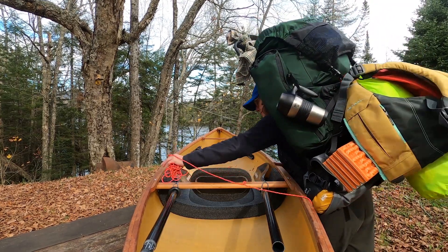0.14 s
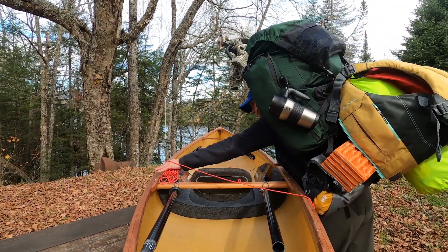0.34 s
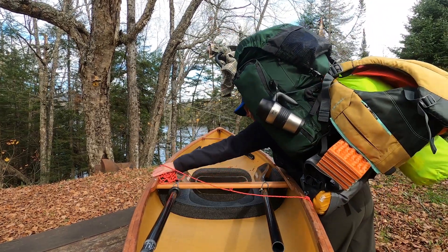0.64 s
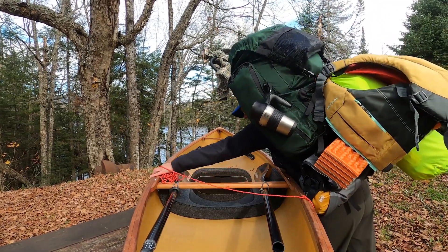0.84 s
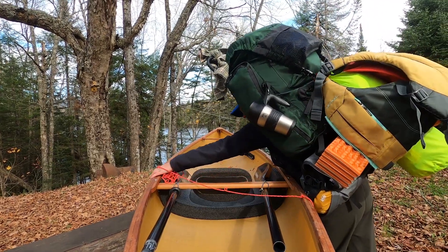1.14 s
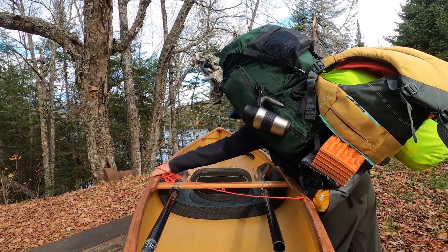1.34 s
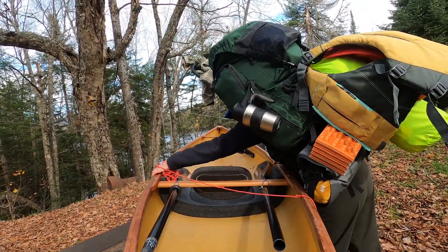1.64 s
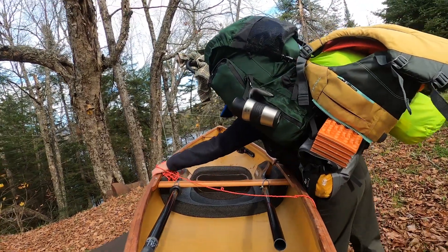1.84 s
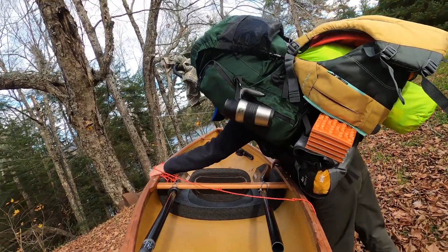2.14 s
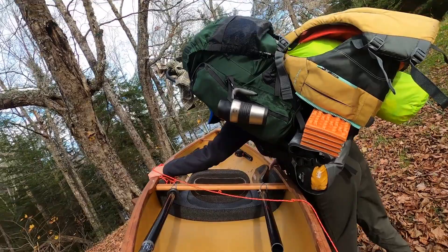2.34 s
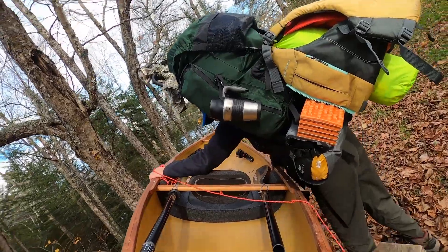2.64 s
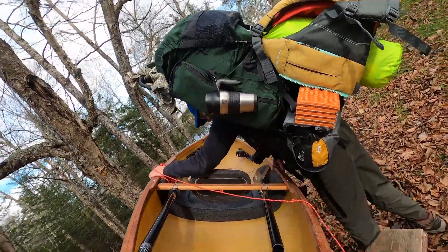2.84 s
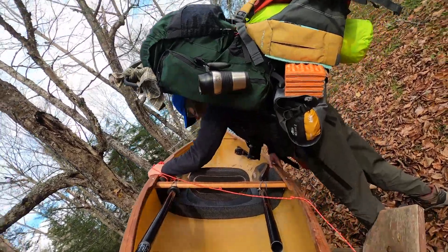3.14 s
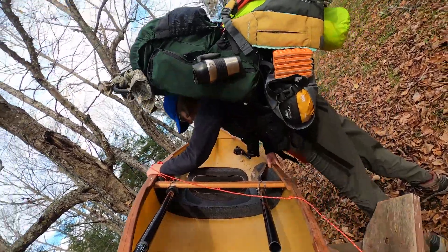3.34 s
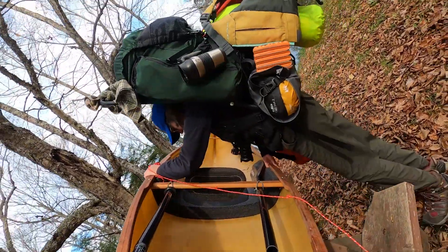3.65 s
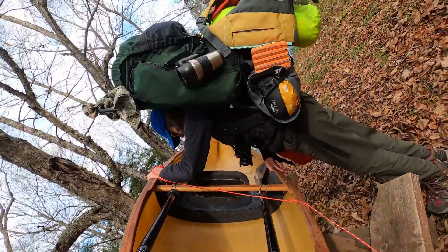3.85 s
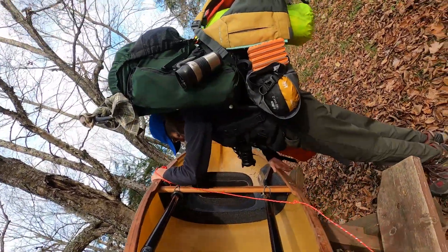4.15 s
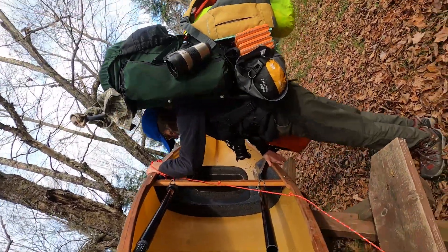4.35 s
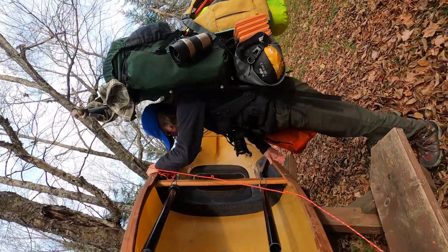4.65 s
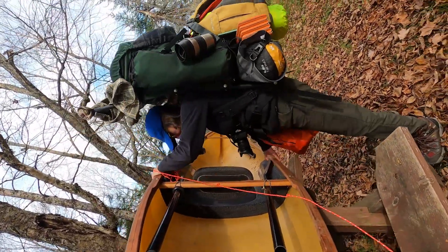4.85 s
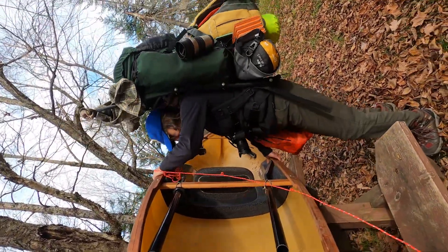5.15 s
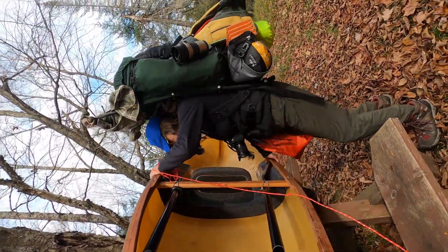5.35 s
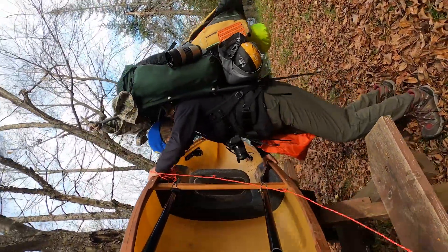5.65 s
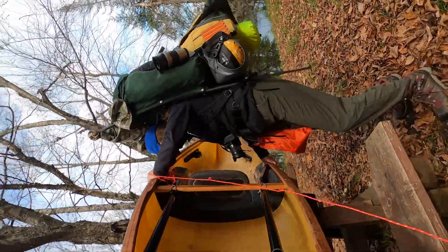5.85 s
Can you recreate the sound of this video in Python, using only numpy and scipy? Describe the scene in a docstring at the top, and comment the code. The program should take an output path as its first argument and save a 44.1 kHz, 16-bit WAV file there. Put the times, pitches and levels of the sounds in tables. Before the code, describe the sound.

Close stereo sound from inside a canoe hull being rolled onto its side in a quiet forest. From 0 to 0.9 s, short hollow judders, gritty scraping and soft low bumps shake the mount. A sharp cluster of knocks with a hard clack and tick comes near 0.96 s, then lighter scrapes and a longer rub with creaks from 1.5 s. Gear clacks at about 1.75 s and knocks follow to 1.9 s; a deep, dull boom at 2.1 s leads into a thin, fading skid until 2.5 s. After a near lull around 2.6 s, the strongest burst of booming, cracking blows hits at 3.0 s. Nylon and dry leaves swish at 3.5-3.7 s, more to the right, and again near 4.75 s. Irregular knocks, scrapes, low groans and small buckle ticks continue from 3.7 s, ending with a rising rustle near 6 s.

```python
"""A canoe hull, rolled onto its side on leafy forest ground by a loaded hiker, heard from inside the shell.
Blows of gunwale and gear excite its bending and panel modes; each blow adds a dry crack of filtered noise.
Stick-slip impulses make it scrape, groan and skid; wavering tones and bands make its judders and squeaks.
Nylon and dry leaves, heard more to the right, are dense filtered impulses; buckles tick, hard gear clacks.
The close stereo microphone is fixed to the hull: its mount trembles with each heave, in still forest air."""
import sys
import numpy as np
from scipy import signal
from scipy.fft import rfft, irfft
from scipy.io import wavfile
from scipy.ndimage import uniform_filter1d, map_coordinates

SR = 44100
rng = np.random.default_rng(int(sys.argv[2]) if len(sys.argv) > 2 else 0)


def to_wav(s):
    """Save 16-bit WAV."""
    ch = np.atleast_2d(s).T  # columns
    pcm = np.round(np.clip(ch, -1, 1) * 32767)  # PCM
    wavfile.write(sys.argv[1], SR, pcm.astype(np.int16))


N = 264600
TIME = np.arange(N) / SR  # s
RING = 22050  # longest ring of a mode, samples
TOP_HZ = 15600  # upper limit of the microphone channel
SKID_S, SKID_LENGTH_S = 2.15, .355  # a lighter, thinner skid as the hull tips over
LULL_DB = -11  # change of stirring at the middle of a lull

# Blows on the hull. Each row: start in seconds, relative levels of boom, hollow tone and knock in dB,
# contact time in ms.
KNOCKS = [(0.34, -42, -52, -48, 0.28), (0.531, -58, -49, -54.5, 0.34), (0.606, -32, -47.5, -55.5, 0.24),
          (.828, -30, -43, -54, 2.6), (0.957, -47, -38.5, -40, 0.26), (.962, -50, -28.5, -35, 0.26),
          (0.971, -30, -55, -37.5, 0.68), (1.053, -59, -40.5, -52, 0.29), (1.279, -40, -36.5, -51, 1.16),
          (1.76, -41.5, -54, -48.5, 0.18), (1.829, -53, -34, -41, 0.28), (1.856, -33.5, -37.5, -44, 0.5),
          (1.881, -26.5, -36, -43, 0.85), (2.073, -41, -27, -58, 5.9), (2.102, -19.5, -30.5, -48, 8.7),
          (2.145, -45, -35.5, -44.5, 0.36), (2.264, -50, -39, -61, 1.4), (2.378, -65, -45, -55.5, 0.52),
          (2.495, -71, -70, -63, 0.22), (2.607, -57, -57, -61, 0.34), (2.82, -41, -39.5, -45, 0.37),
          (2.952, -39, -41, -49, 2.2), (3.007, -15.5, -31, -34, 0.34), (3.012, -22, -34, -33, 0.34),
          (3.016, -33, -34, -38.5, 0.65), (3.029, -19, -38, -41, 0.34), (3.038, -38, -41, -45, 0.45),
          (3.071, -36, -39, -42, 1.7), (3.13, -63, -39, -42.5, 1.03), (3.202, -37, -35.5, -47, 0.31),
          (3.225, -47, -40, -47.5, 3.1), (3.311, -37.5, -44, -68, 18), (3.449, -38.5, -43.5, -51, 0.33),
          (3.705, -55, -50, -54.5, 0.29), (3.763, -48, -48, -47.5, .3), (3.823, -48, -40.5, -46, 0.67),
          (4.219, -38, -46, -62, 6), (4.262, -46, -42.5, -53.5, 0.56), (4.308, -36, -43, -51.5, 0.67),
          (4.339, -54, -42, -50, 0.36), (4.419, -42, -42, -49.5, 0.33), (4.453, -29.5, -47, -70, 2),
          (4.515, -33.5, -34.5, -37, 0.84), (4.529, -28.5, -36.5, -60, 1.7), (4.687, -43, -47, -47, 0.26),
          (4.724, -33, -41.5, -38, 0.33), (4.833, -55, -49.5, -54, 0.31), (4.923, -34.5, -39, -48, 0.38),
          (4.969, -31.5, -34, -41, 0.66), (5.06, -55, -63, -59, 0.22), (5.253, -36, -44.5, -52.5, 0.53),
          (5.268, -36, -43, -54.5, 0.6), (5.338, -30.5, -42, -43.5, 0.25), (5.475, -53, -46, -55, 2.2),
          (5.566, -47, -50, -58, 0.23), (5.596, -47, -45.5, -45, 0.58), (5.651, -57, -60, -58.5, 0.7),
          (5.754, -60, -52.5, -41.5, 0.56), (5.774, -52, -49, -45, 1.2), (5.895, -45, -51, -50.5, 0.43)]
# Whole-shell bending modes, which move the two sides unlike. Each row: nominal frequency in Hz,
# relative level in dB, decay by 60 dB in seconds, right minus left in dB, right phase in radians.
HULL_MODES = [(63.5, -15.5, 0.56, 2, 0.36), (87.3, -3.5, 0.29, -14.5, 1.4), (112.5, 3, 0.24, 8.5, 3.81),
              (133.6, 8.5, 0.3, 2.5, 3.84)]
# Panel modes. Each row: nominal frequency in Hz, relative level in dB, decay by 60 dB in seconds.
PANEL_MODES = [(178.9, 7.5, 0.13), (207.6, -2, 0.4), (248, 5.5, 0.24), (276.6, 4.5, 0.16),
               (314.1, -2.5, 0.27), (341.5, -2.5, 0.27), (396.5, 6.5, 0.16), (446.3, 14, 0.065),
               (495, -0.5, 0.33), (552.5, 5.5, 0.15), (623.5, 6, 0.12), (710, -7, 0.17), (779, -3.5, 0.18),
               (836, -2.5, 0.1), (917, -3.5, 0.19), (1007, 13, 0.011)]
# Quick reflections between the hull walls. Each row: delay in seconds, gain as a ratio.
WALLS = [(.0013, 0.031), (.0026, 0.025), (.0044, 0.08), (.0071, 0.33)]
# Gunwale drags. Each row: start, length and build-up in seconds, relative levels of scrape and rasp in dB,
# slip rate in Hz.
SCRAPES = [(0, 0.17, 0.011, -81, -63, 300), (0.13, 0.15, 0.0083, -38, -41, 324),
           (0.316, 0.18, 0.02, -57.5, -51, 354), (0.553, 0.33, 0.37, -52.5, -50.5, 281),
           (0.998, 0.053, .02, -45, -54.5, 281), (1.095, 0.055, 0.039, -72, -53, 275),
           (1.306, 0.038, .02, -50, -54, 268), (1.435, 0.087, 0.031, -51.5, -61, 245),
           (1.523, 0.34, 0.069, -47.5, -43.5, 305), (1.858, .22, 0.022, -41.5, -42, 300),
           (2.028, 0.065, 0.044, -61, -44, 296), (2.2, 0.14, 0.037, -47, -54.5, 265),
           (2.927, 0.24, 0.015, -44.5, -63.5, 310), (3.63, 0.17, 0.06, -41, -45.5, 275),
           (3.867, 0.22, 0.11, -48, -54, 253), (4.361, 0.22, 0.035, -46, -52.5, 249),
           (4.63, 0.2, 0.026, -59, -49, 340), (4.898, 0.084, 0.016, -45.5, -53.5, 363),
           (5.25, 0.053, 0.016, -42, -69, 357), (5.836, 0.44, 0.019, -59, -52, 280)]
# Spectrum of grit under the gunwale. Each row: frequency in Hz, relative level in dB.
RASP_SPECTRUM = [(350, 4.5), (600, 9.5), (1000, 8.5), (1500, 8), (2000, 5.5), (2800, 3.5), (3250, 1),
                 (3800, -6.5), (5000, -12), (7000, -23), (9500, -29.5), (15000, -73.5)]
# Heaves that strain the shell and shake the mount. Each row: start and length in seconds,
# relative levels of groan and tremble in dB.
HEAVES = [(0.034, 0.54, -49, -41), (0.518, 0.34, -47, -32.5), (1.004, 0.073, -28.5, -46),
          (1.255, 0.1, -36.5, -37), (1.44, 0.26, -38, -61), (1.793, 0.19, -35, -35),
          (2.03, 0.21, -28.5, -43), (2.297, 0.12, -35.5, -45), (2.85, 0.47, -37, -37.5),
          (3.477, 0.16, -40.5, -49), (3.746, 0.38, -35.5, -42), (4.303, 0.14, -43, -39),
          (4.617, 0.56, -46, -38.5), (5.263, 0.33, -34, -41), (5.808, 0.19, -40.5, -46.5)]
# Soft shoves on the mount. Each row: middle in seconds, frequency in Hz, half length in seconds,
# left and right levels in dB.
SHOVES = [(0.363, 96, 0.01, -16, -48), (0.364, 42.6, 0.023, -26.5, -26.5), (0.624, 47.5, 0.037, -19, -42),
          (0.844, 78.6, 0.026, -28, -40), (5.59, 90, 0.023, -28, -35)]
# Pauses in which stirring eases. Each row: middle and half length in seconds.
LULLS = [(1.185, 0.044), (2.637, 0.15), (4.264, .035), (5.516, 0.02)]
# Strokes of nylon and leaves. Each row: middle and half length in seconds, relative level in dB.
SWISHES = [(0.282, 0.23, -67), (0.874, 0.016, -55), (0.903, 0.025, -54), (1.04, 0.039, -66),
           (1.132, 0.011, -63), (1.74, 0.19, -56.5), (2.052, 0.1, -59), (2.836, 0.069, -64),
           (3.155, 0.73, -62.5), (3.471, 0.048, -46.5), (3.567, 0.095, -41), (3.682, 0.12, -44),
           (4.048, 0.21, -59.5), (4.425, 0.16, -60.5), (4.693, 0.18, -53), (4.759, 0.12, -44.5),
           (4.943, 0.055, -55.5), (5.181, 0.12, -59.5), (5.894, 0.03, -46.5), (5.99, 0.07, -37)]
# Spectrum of nylon and dry leaves. Each row: frequency in Hz, relative level in dB.
CLOTH_SPECTRUM = [(600, -1.5), (1200, 3), (2200, 5), (3500, 7), (5200, 7), (7000, -2), (9300, -1.5),
                  (11000, -9.5), (13000, -10.5), (15500, -28)]
# Spectrum of still forest air. Each row: frequency in Hz, relative level in dB.
AIR_SPECTRUM = [(30, -28), (100, 14), (300, -37), (1000, -5), (3000, -18), (6000, -19), (9000, -22.5),
                (12000, -39.5), (15000, -72)]
# Stick-slip locks briefly onto a panel. Each row: start and length in seconds, mean pitch in Hz, level in dB.
JUDDERS = [(.134, 0.062, 321.5, -36), (0.159, 0.021, 268, -35.5), (0.235, 0.045, 266, -36),
           (1.746, 0.1, 349, -42.5), (2.07, 0.033, 256, -27), (2.261, 0.038, 259.3, -34.5),
           (2.958, 0.063, 278, -41.5)]
# Rubbing in narrow or broad bands. Each row: start and length in seconds, mean pitch in Hz,
# rate of the random waver in Hz, relative level in dB.
SQUEAKS = [(0.216, 0.038, 2840, 1002, -46.5), (1.57, 0.18, 1545, 200.3, -52.5),
           (1.727, 0.022, 2084, 129.3, -46), (1.904, .06, 2670, 90, -55),
           (2.018, 0.019, 1587, 109.2, -45.5), (4.38, 0.11, 1347, 50.1, -60),
           (2.604, 0.26, 8500, 1400, -71.5)]
# Hard gear against the gunwale. Each row: start in seconds, peak level in dB.
CLACKS = [(0.341, -47), (0.9644, -32), (1.747, -27), (1.761, -22), (1.831, -35), (1.88, -31),
          (2.146, -34.5), (4.342, -44), (5.754, -35), (5.764, -36)]
# Ring of that gear. Each row: nominal frequency in Hz, relative level in dB, decay by 60 dB in seconds.
GEAR_MODES = [(990, -2, 0.023), (1230, -6, 0.023), (1457, -0.5, 0.034), (1755, -7, 0.022),
              (2630, -8, 0.024)]
# Taps of buckles and twigs. Each row: start in seconds, relative level in dB.
TICKS = [(.563, -54), (.754, -57), (.9625, -29), (1.301, -52), (1.348, -52), (1.577, -37), (1.68, -46),
         (1.761, -38), (1.832, -44), (3.705, -38), (3.763, -29), (3.793, -41), (4.028, -47), (4.358, -47),
         (4.409, -43), (4.417, -37), (4.536, -46), (4.953, -45), (5.066, -49), (5.567, -47), (5.575, -48),
         (5.675, -49)]
# Resonances of the skidding shell. Each row: frequency in Hz, relative level in dB.
SKID_SPECTRUM = [(700, -20), (1310, 12), (1900, -5), (2200, 12), (2550, 2), (2870, 5), (3300, 4), (3600, 9),
                 (4020, -2), (4500, 1), (5000, -16), (6000, -10), (6450, -13), (7000, -38), (14000, -40)]


def undb(db):
    """Decibels to gain."""
    return 10 ** (np.asarray(db) / 20)


def unit(x):
    """Scale to rms 1."""
    return x / np.sqrt(np.mean(np.abs(x) ** 2) + 1e-20)


def add(out, s, sound):
    """Mix a stereo sound in at time s."""
    i = max(0, int(s * SR))
    out[:, i:i + sound.shape[1]] += sound[:, :N - i]


def colour(x, points):
    """Filter by a (Hz, dB) spectrum, then scale to rms 1."""
    hz, db = np.transpose(points)
    f = np.fft.rfftfreq(N, 1 / SR)
    gain = undb(np.interp(np.log(f + 1), np.log(hz), db))
    return unit(irfft(rfft(x) * gain, N))


def walk(rate):
    """Smooth random motion with a spread near 1, moving to a new value about `rate` times a second."""
    k = max(2, int(SR / rate))
    steps = np.repeat(rng.standard_normal(N // k + 1), k)
    return unit(uniform_filter1d(steps, k)[:N])


def slips(rate, spread_db):
    """Tiny stick-slip releases of uneven size, `rate` a second on average."""
    sizes = undb(spread_db * np.minimum(rng.exponential(size=N), 4))
    releases = rng.random(N) < rate / SR
    return unit(releases * rng.choice([-1, 1], N) * sizes)


def ports(x, lag_ms, right_db, scatter_hz):
    """Sound from the right reaches the left microphone port later; its high treble is scattered and shadowed."""
    f = np.fft.rfftfreq(N, 1 / SR)
    share = np.clip(.04 + (f / scatter_hz) ** 2, 0, 1)
    scatter = unit(rfft(rng.standard_normal(1500), N))
    shadow = 1 / np.sqrt(1 + (f / 11500) ** 8)
    delay = np.exp(-2j * np.pi * f * lag_ms / 1000)
    mix = np.sqrt(1 - share) + np.sqrt(share) * scatter
    left = irfft(rfft(x) * shadow * delay * mix, N)
    return unit(np.array([left, x * undb(right_db)]))


def stroke(start_s, length_s, attack_s, release_s):
    """A push builds up, holds, then dies away."""
    age = TIME - start_s
    return np.clip(age / attack_s, 0, 1) * np.exp(-np.clip((age - length_s) / release_s, 0, 20))


def together(levels, rest):
    """Unrelated motions add in power, over a resting level."""
    return np.sqrt(sum(g ** 2 for g in levels) + rest ** 2)


def stirring(db):
    """Level of slight movement between the heaves, easing in the pauses."""
    lull = sum(np.exp(-((TIME - s) / half_s) ** 2) for s, half_s in LULLS)
    return undb(db + LULL_DB * lull)


def inside(x):
    """The hull walls return a sound within milliseconds and comb its spectrum."""
    return unit(x + sum(gain * np.roll(x, int(s * SR)) for s, gain in WALLS))


def sliding(x, echo=0.32, delay_s=0.001622, wander=0.13):
    """The contact travels along the hull, so its nearest reflection, and the comb it makes, keep shifting."""
    lag = delay_s * SR * (1 + wander * walk(14))
    return unit(x + echo * map_coordinates(x, [np.arange(N) - lag], order=1, mode="nearest"))


def shell(t60_1k_s=0.1, t60_slope=0.48, dense_db=-8.0, lag_ms=0.084, count=240):
    """Strong low modes, then a crowd that dies faster with pitch; returns Hz, gains and stereo ringing."""
    fine = np.geomspace(660, 15000, count) * (1 + .01 * rng.standard_normal(count))
    fine_db = dense_db + 2.0 * rng.standard_normal(count)
    fine_t60 = t60_1k_s * (fine / 1000) ** -t60_slope
    upper = np.vstack([PANEL_MODES, np.transpose([fine, fine_db, fine_t60])])
    upper_hz = upper[:, 0]
    # short waves reach the two ports less alike
    unlike = (.26 + upper_hz / 11000) * rng.standard_normal((2, len(upper)))
    lag = 2 * np.pi * upper_hz * lag_ms / 1000
    upper = np.column_stack([upper, .7 + 5 * unlike[0], lag + unlike[1]])
    hz, db, t60, right_db, phase = np.vstack([HULL_MODES, upper]).T[:, :, None]
    t = np.arange(RING) / SR
    build_up = 1 - np.exp(-(t * hz / 0.72) ** 2)  # a mode needs about a cycle to build up
    decay = np.exp(-np.log(1000) * t / t60) * build_up
    turn = 2 * np.pi * hz * t
    left = decay * np.sin(turn) * undb(-right_db / 2)
    right = decay * np.sin(turn + phase) * undb(right_db / 2)
    return hz[:, 0], undb(db[:, 0]), np.array([left, right])


def registers(hz):
    """Which modes make the boom, the hollow tone, the knock and the crack."""
    zone = np.digitize(hz, [170, 380, 1300])
    return [zone == k for k in range(4)]


def scraping(hz, weight, ringing, scrape_db=0, rasp_db=0.0, damping_s=0.011, slip_q=0.29, release_s=0.058,
             uneven_db=0.62, rest_hz=285, scrape_rest_db=-60, rasp_rest_db=-64.5, coarse_db=-8.5):
    """Stick-slip at the gunwale makes the panels scrape; the grit itself rasps."""
    held = np.exp(-np.arange(RING) / SR / damping_s)  # the contact damps the panels it touches
    _, hollow, knock, _ = registers(hz)
    panel = hollow | knock
    hz, ringing = hz[panel], ringing[:, panel] * held
    push = weight[panel] * rng.permutation((-1) ** np.arange(len(hz)))
    catches = slips(600, 1.93)[None]
    pressure = undb(uneven_db * walk(27))  # the load on the gunwale is never even
    drags = [(stroke(s, length, grab_s, release_s), *rest) for s, length, grab_s, *rest in SCRAPES]
    drives = [(drag * undb(db), slip_hz) for drag, db, _, slip_hz in drags]
    drives.append((stirring(scrape_rest_db), rest_hz))
    scrape = 0
    for drive, slip_hz in drives:
        # the slips mainly reach the panel modes near their own rate
        resonance = 1 + (slip_q * (hz / slip_hz - slip_hz / hz)) ** 2
        skirts = np.sqrt(1 + (hz / (1.016 * slip_hz)) ** 8 + (0.63 * slip_hz / hz) ** 12)
        response = ((push / resonance / skirts) @ ringing)[:, :RING // 4]
        panels = unit(signal.oaconvolve(catches, response, axes=1)[:, :N])
        scrape = scrape + drive * pressure * panels
    rasp = together((drag * undb(db) for drag, _, db, _ in drags), stirring(rasp_rest_db))
    fine_grains = slips(4500, 2.2) * undb(1.5 * walk(90))
    grains = fine_grains + undb(coarse_db) * slips(130, 2.5)
    grit = sliding(inside(colour(grains, RASP_SPECTRUM)))
    grit = ports(grit, lag_ms=.036, right_db=.5, scatter_hz=12000)
    return scrape * undb(scrape_db) + grit * rasp * pressure * undb(rasp_db)


def forest_air():
    """Faint steady noise of still air, partly shared by the two ports."""
    noise = rng.standard_normal(N) + .5 * rng.standard_normal((2, N))
    return colour(noise, AIR_SPECTRUM) * undb(-65.0)


def swishing(swish_db=2, taper=1.82, rest_db=-76, crinkle_db=-13.0):
    """Countless fibres and leaf edges catch and let go; each stroke speeds up and slows down smoothly."""
    fine = slips(9000, 3.5) * undb(1.54 * walk(70))
    fibres = colour(fine + undb(crinkle_db) * slips(90, 3.8), CLOTH_SPECTRUM)
    fibres = ports(fibres, lag_ms=.064, right_db=3, scatter_hz=17000)
    strokes = (undb(db) / (1 + ((TIME - s) / half_s) ** 2) ** taper for s, half_s, db in SWISHES)
    speed = together(strokes, stirring(rest_db))
    folds = undb(.9 * walk(35))
    return fibres * speed * folds * undb(swish_db)


def heaving(attack_s=0.031, release_s=0.065, groan_rest_db=-57, tremble_rest_db=-53):
    """Each heave loads the shell and the mount alike; returns the levels of groan and tremble."""
    efforts = [(stroke(s, length, attack_s, release_s), groan, tremble)
               for s, length, groan, tremble in HEAVES]
    groan = together((effort * undb(db) for effort, db, _ in efforts), stirring(groan_rest_db))
    tremble = together((effort * undb(db) for effort, _, db in efforts), undb(tremble_rest_db))
    return groan, tremble


def groaning(hz, weight, ringing, groan, groan_db=-3):
    """Under load, stick-slip at the gunwale makes the lowest modes of the whole shell groan."""
    boom = registers(hz)[0]
    push = weight * rng.choice([-1, 1], len(hz))
    response = push[boom] @ ringing[:, boom]
    tone = unit(signal.oaconvolve(slips(600, 6.2)[None], response, axes=1)[:, :N])
    return tone * groan * undb(groan_db)


def shaking(effort, rumble_db=-4.0, apart=1.0):
    """The mount trembles as low-passed noise, and shoves rock it for a few cycles."""
    tremble = rng.standard_normal(N) + apart * rng.standard_normal((2, N))
    rumble = [(8, -11.5), (22, -12.0), (55, -9.0), (80, -15.5), (140, -22.5), (400, -43.5), (2000, -100)]
    out = colour(tremble, rumble) * effort * undb(rumble_db)
    for s, hz, half_s, left_db, right_db in SHOVES:
        rock = np.exp(-((TIME - s) / half_s) ** 2) * np.sin(2 * np.pi * hz * (TIME - s))
        out = out + undb([[left_db], [right_db]]) * rock
    return out


def juddering(judder_db=0, attack_s=0.0044, release_s=0.015, waver=0.04, octave_db=-24):
    """Regular slips near a panel's pitch make a short, hollow, wavering tone with a faint octave."""
    drift = np.cumsum(1 + waver * walk(60)) / SR  # wavering clock, s
    out = 0
    for s, length, hz, db in JUDDERS:
        turn = 2 * np.pi * hz * (drift - drift[int(s * SR)])
        tone = np.sin(turn) + undb(octave_db) * np.sin(2 * turn)
        out = out + stroke(s, length, attack_s, release_s) * undb(db) * tone
    return np.sqrt(2) * out * undb(judder_db)


def squeaking(squeak_db=0.0, waver=0.012, attack_s=0.023, release_s=0.024):
    """Wavering rub tones: creaks from the hull and a faint, high, airy hiss."""
    drift = np.cumsum(1 + waver * walk(16)) / SR  # wavering clock, s
    out = 0
    for s, length, hz, width, db in SQUEAKS:
        turn = 2 * np.pi * hz * drift
        band = walk(width) * np.cos(turn) + walk(width) * np.sin(turn)
        out = out + band * stroke(s, length, attack_s, release_s) * undb(db)
    return ports(out, lag_ms=.04, right_db=.5, scatter_hz=14000) * np.std(out) * undb(squeak_db)


def reloaded(ring, detune):
    """The load on the shell changes from blow to blow and shifts all its modes a little."""
    clock = np.arange(RING) * (1 + detune * rng.uniform(-1.12, 1))
    return np.array([map_coordinates(side, [clock]) for side in ring])


def knocks(hz, weight, ringing, spot_db=3.0, boom_db=-1, hollow_db=-1.0, knock_db=1, crack_db=-13,
           crack_db_per_octave=17.0, steep=4.2, detune=0.021):
    """Each blow lands on another spot and so weights the modes anew; the shorter the contact, the more it cracks."""
    out = np.zeros((2, N))
    attack = int(.04 * SR)  # levels are set over the first 40 ms
    zones = registers(hz)
    skin = 1 / np.sqrt(1 + (hz / 11000) ** 8)
    for s, boom, hollow, knock, contact_ms in KNOCKS:
        edge_hz = 1000 / contact_ms  # a longer contact excites less treble
        crack = knock + crack_db_per_octave * np.log2(edge_hz / 2400)
        signs = np.where(zones[0], 1, rng.choice([-1, 1], len(hz)))
        spot = undb(spot_db * rng.standard_normal(len(hz))) * signs
        push = weight * spot * skin / np.sqrt(1 + (hz / edge_hz) ** steep)
        levels = (boom + boom_db, hollow + hollow_db, knock + knock_db, crack + crack_db)
        blow = 0
        for modes, db in zip(zones, levels):
            first, last = np.flatnonzero(modes)[[0, -1]]
            ring = (push * modes)[first:last + 1] @ ringing[:, first:last + 1]
            blow = blow + ring * undb(db) / np.sqrt(np.mean(ring[:, :attack] ** 2))
        add(out, s, reloaded(blow, detune))
    return out


def fading(blows, decay_s):
    """Each blow jumps up and dies away."""
    return signal.lfilter([1], [1, -np.exp(-1 / (decay_s * SR))], blows)


def cracking(crack_db=-1.0, tilt_db_per_octave=0.5, decay_s=0.0061, decay_slope=0.38, steep=5.3):
    """A hard blow also gives a broad, dry crack, and the wooden trim chatters after it."""
    s, _, _, knock, contact_ms = np.transpose(KNOCKS)
    edge_hz = 1000 / contact_ms
    chatter = slips(600, 2.5)
    rattle_db, rattle_s = -19, .022
    lowest_hz = 1400
    out = 0
    for hz in np.geomspace(lowest_hz, 7400, 5):
        level = undb(knock + tilt_db_per_octave * np.log2(hz / lowest_hz))
        blows = np.zeros(N)
        blows[(s * SR).astype(int)] = level / np.sqrt(1 + (hz / edge_hz) ** steep)
        band = [(hz / 2, -50), (hz / 1.25, 0), (hz * 1.25, 0), (hz * 2, -50)]
        band_decay_s = decay_s * (hz / lowest_hz) ** -decay_slope
        burst = colour(rng.standard_normal(N), band) * fading(blows, band_decay_s)
        rattle = colour(chatter, band) * fading(blows, rattle_s) * undb(rattle_db) * lowest_hz / hz
        out = out + burst + rattle
    return ports(out, lag_ms=.04, right_db=.8, scatter_hz=11000) * np.std(out) * undb(crack_db)


def clacking(clack_db=0, lag_ms=0.037):
    """Hard gear gives a short, dry ring, a little different at each contact and later at the left port."""
    out = np.zeros((2, N))
    lag_s = np.array([[lag_ms / 1000], [0]])
    t = np.maximum(np.arange(RING // 4) / SR - lag_s, 0)
    for s, db in CLACKS:
        pitch = 1 + .02 * rng.standard_normal(len(GEAR_MODES))
        ring = 0
        for k, (hz, mode_db, t60) in enumerate(GEAR_MODES):
            decay = np.exp(-np.log(1000) * t / t60)
            ring = ring + (-1) ** k * undb(mode_db) * decay * np.sin(2 * np.pi * hz * pitch[k] * t)
        add(out, s, ring / np.abs(ring).max() * undb(db + clack_db))
    return out


def ticking(tick_db=-6):
    """Small hard parts tap with hardly any ring: noise that decays in milliseconds."""
    decay_s = .002
    strike = sum(undb(db) * np.exp(-np.abs(TIME - s) / decay_s) * (TIME >= s) for s, db in TICKS)
    spectrum = [(900, -32), (2500, -41.0), (5000, 1.5), (10000, -15.5), (15000, -28)]
    snap = colour(rng.standard_normal(N), spectrum)
    snap = ports(snap, lag_ms=.05, right_db=2.5, scatter_hz=14000)
    return snap * strike * undb(tick_db)


def skidding(skid_db=-50.0, attack_s=0.04, release_s=0.031, fade_db_per_s=27):
    """With its weight coming off, the shell slides on finer, faster slips, then stops short."""
    slide = inside(colour(slips(5000, 3), SKID_SPECTRUM))
    slide = ports(slide, lag_ms=.04, right_db=0, scatter_hz=8000)
    unloading = undb(-fade_db_per_s * np.clip(TIME - SKID_S, 0, 1))
    return slide * stroke(SKID_S, SKID_LENGTH_S, attack_s, release_s) * unloading * undb(skid_db)


def scene():
    """Hull, gear and forest together; open air gives no echo."""
    hull = shell()
    groan, tremble = heaving()
    rubbing = scraping(*hull) + groaning(*hull, groan) + juddering() + squeaking() + skidding()
    blows = knocks(*hull) + cracking()
    gear = swishing() + clacking() + ticking()
    return rubbing + blows + gear + shaking(tremble) + forest_air()


def record(dry):
    """The microphone channel cuts the top with a steep low-pass."""
    return signal.sosfilt(signal.ellip(8, .2, 80, TOP_HZ, fs=SR, output="sos"), dry)


dry = scene()
out = record(dry)
to_wav(out)
```